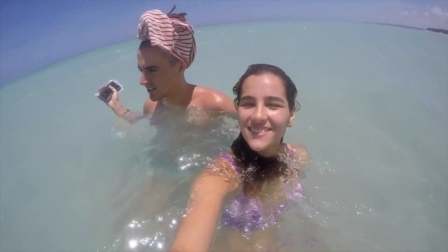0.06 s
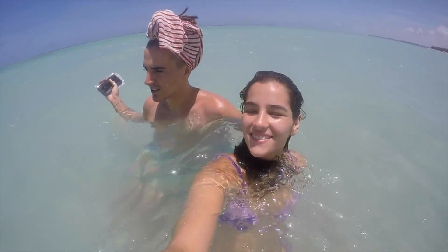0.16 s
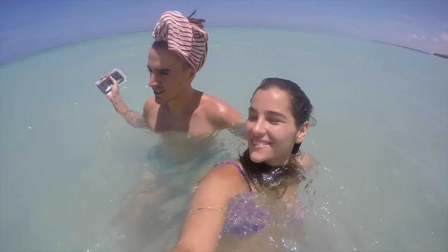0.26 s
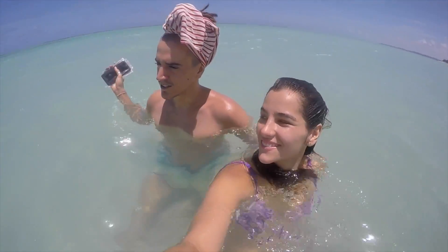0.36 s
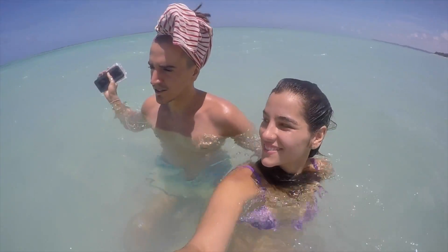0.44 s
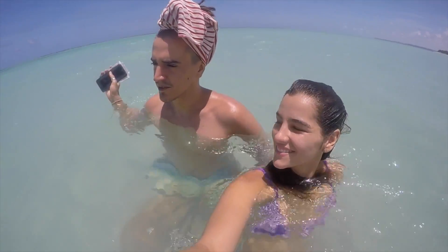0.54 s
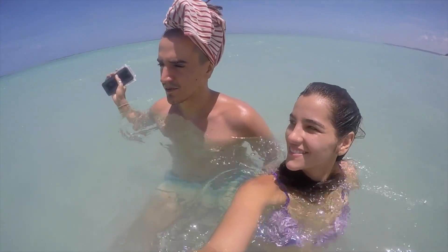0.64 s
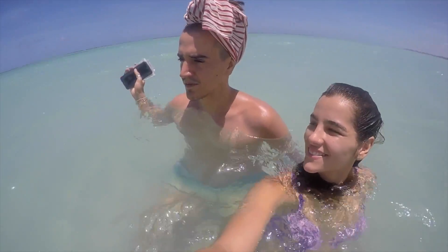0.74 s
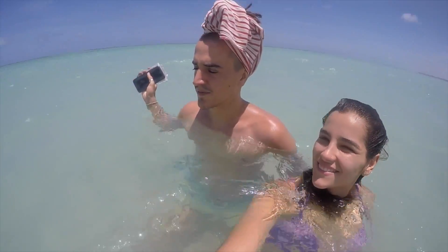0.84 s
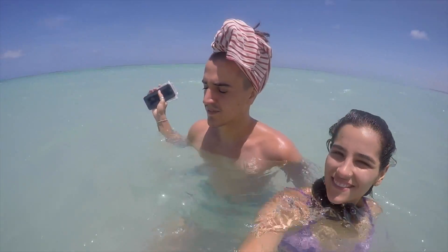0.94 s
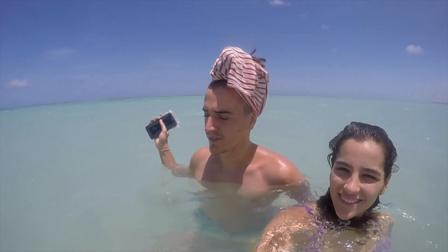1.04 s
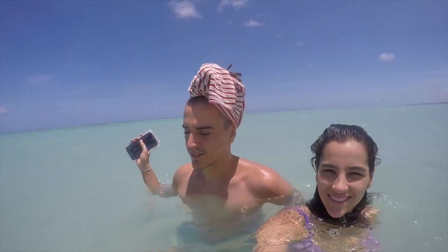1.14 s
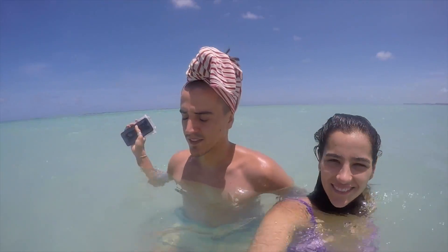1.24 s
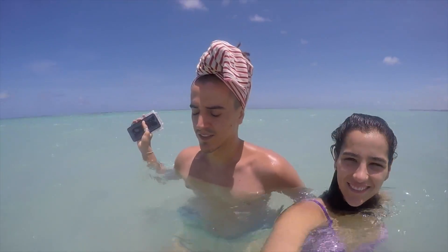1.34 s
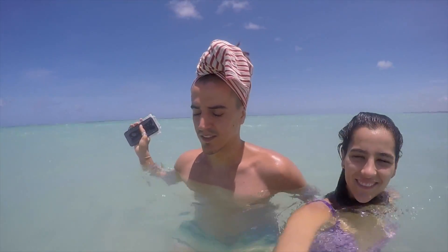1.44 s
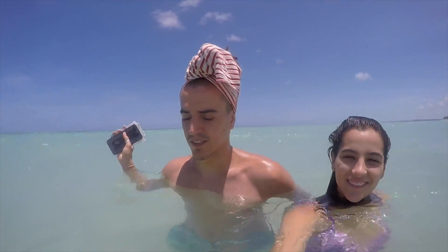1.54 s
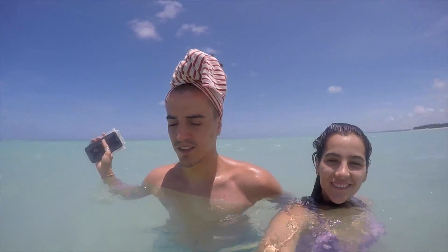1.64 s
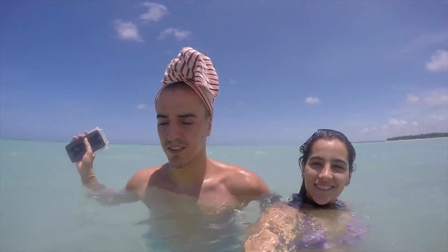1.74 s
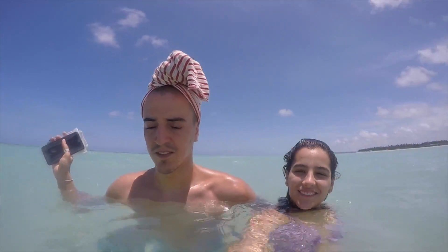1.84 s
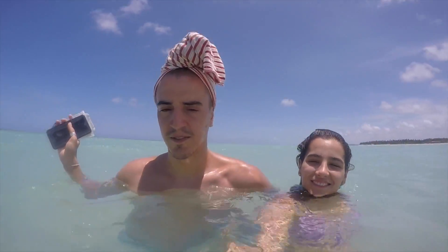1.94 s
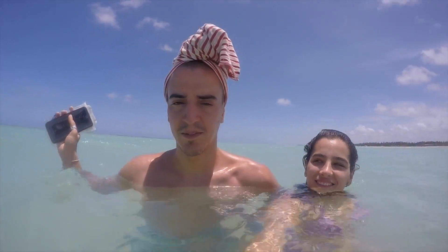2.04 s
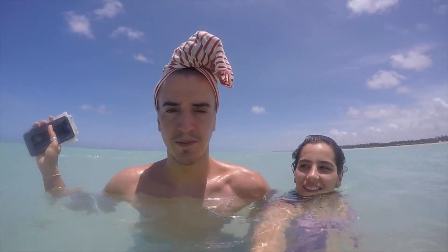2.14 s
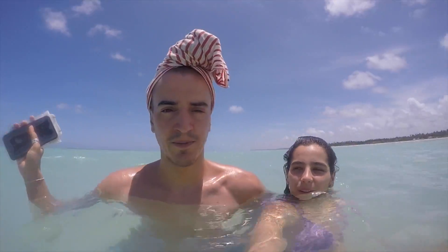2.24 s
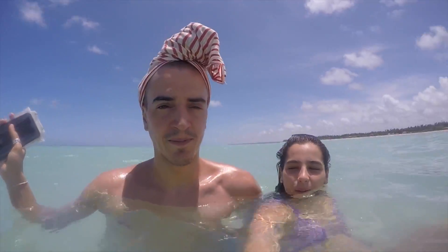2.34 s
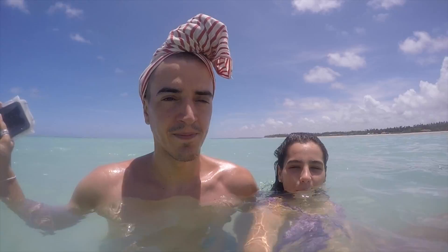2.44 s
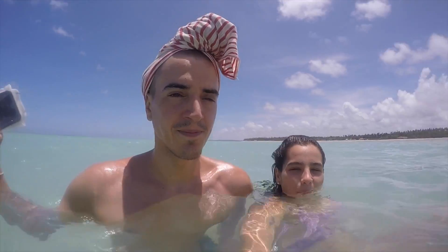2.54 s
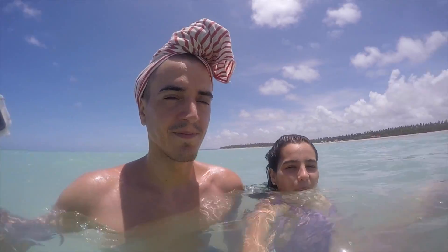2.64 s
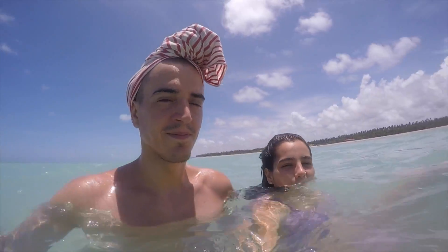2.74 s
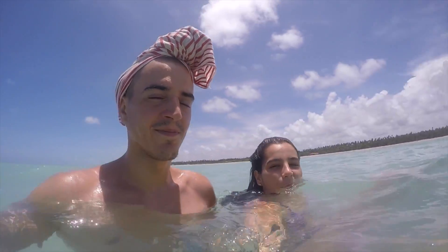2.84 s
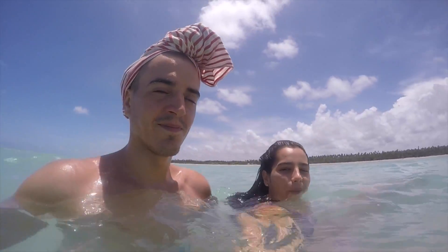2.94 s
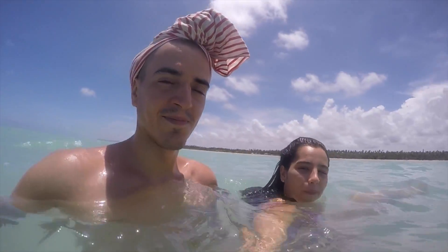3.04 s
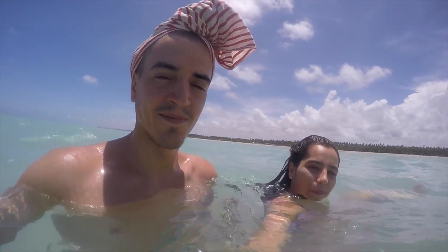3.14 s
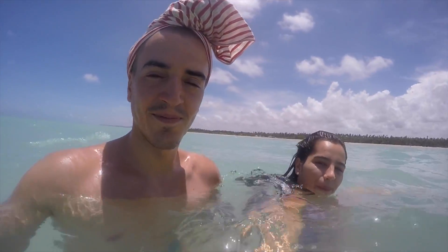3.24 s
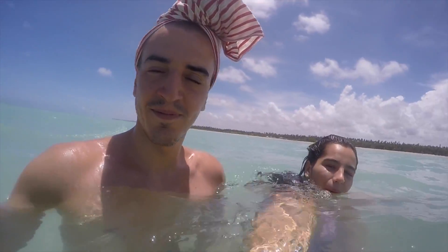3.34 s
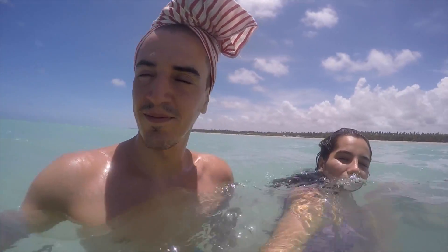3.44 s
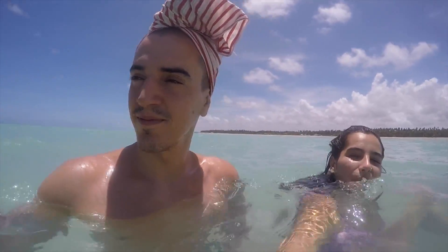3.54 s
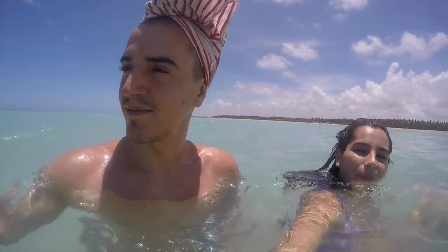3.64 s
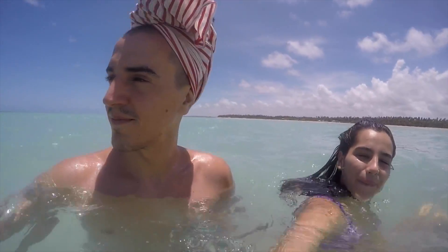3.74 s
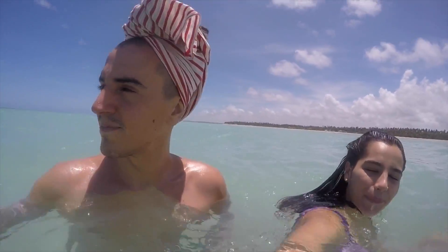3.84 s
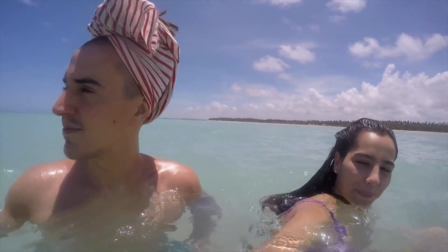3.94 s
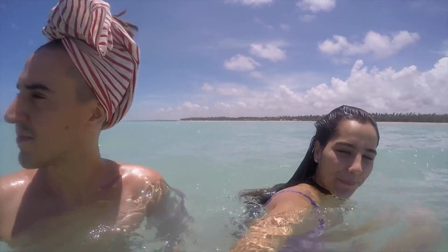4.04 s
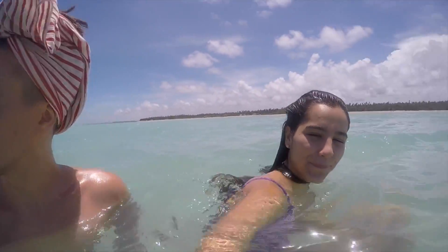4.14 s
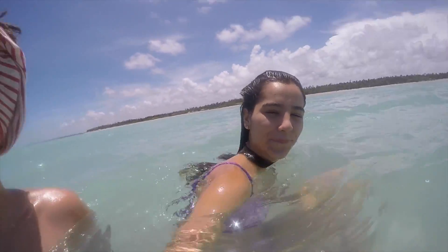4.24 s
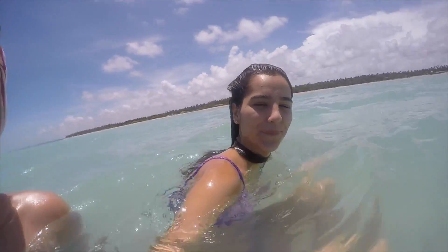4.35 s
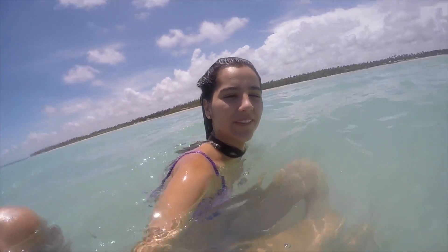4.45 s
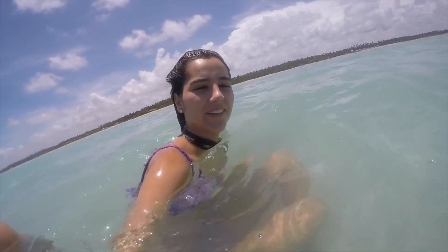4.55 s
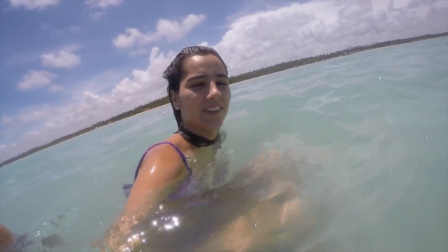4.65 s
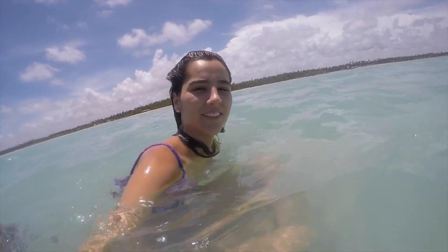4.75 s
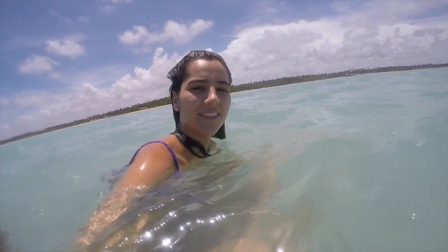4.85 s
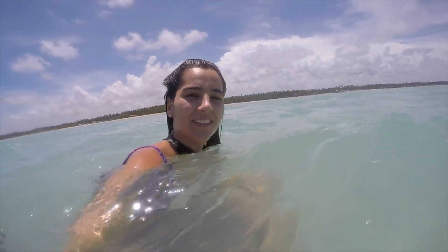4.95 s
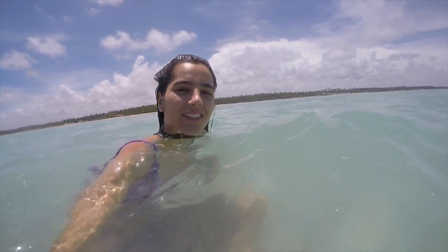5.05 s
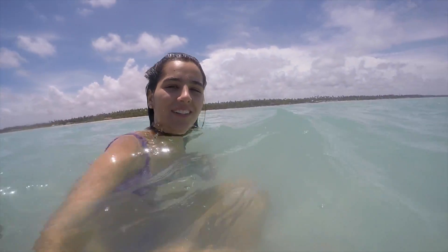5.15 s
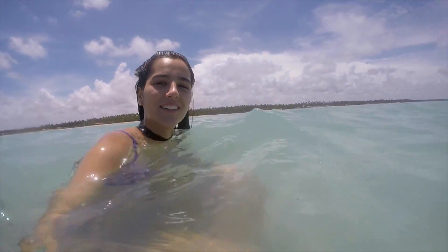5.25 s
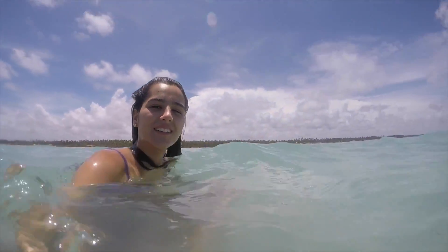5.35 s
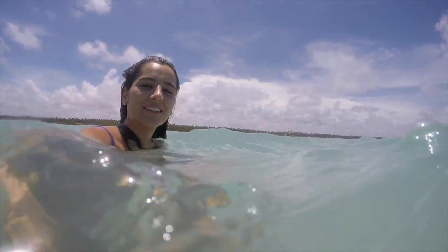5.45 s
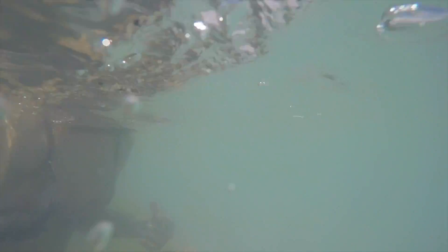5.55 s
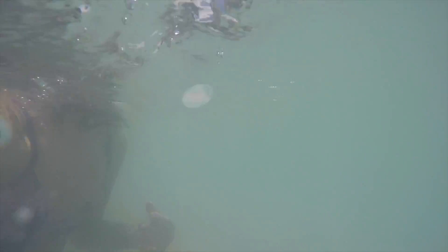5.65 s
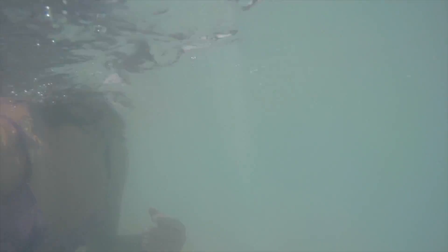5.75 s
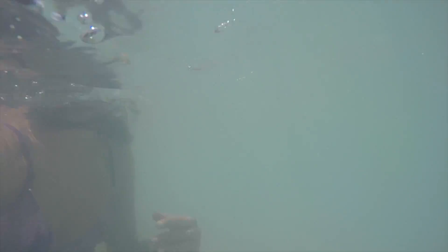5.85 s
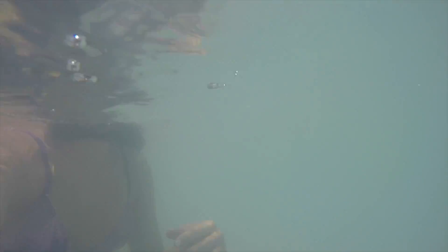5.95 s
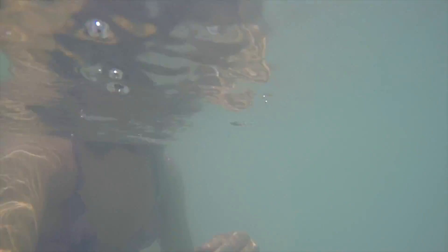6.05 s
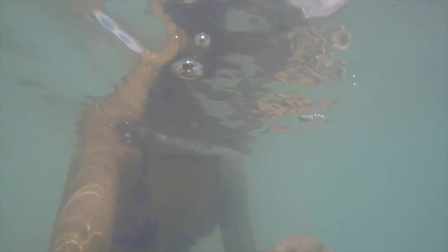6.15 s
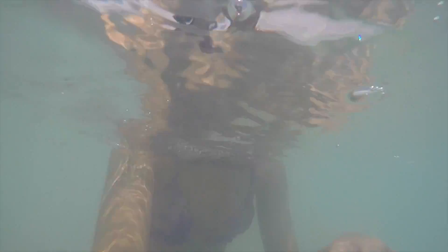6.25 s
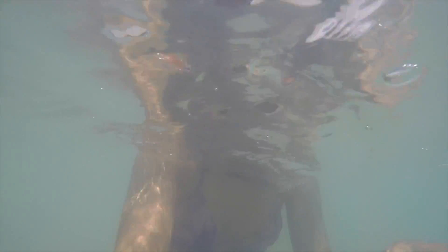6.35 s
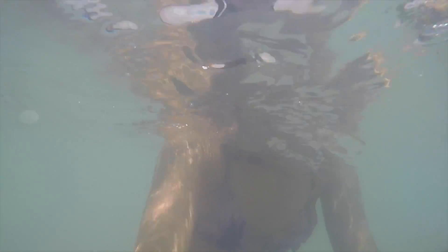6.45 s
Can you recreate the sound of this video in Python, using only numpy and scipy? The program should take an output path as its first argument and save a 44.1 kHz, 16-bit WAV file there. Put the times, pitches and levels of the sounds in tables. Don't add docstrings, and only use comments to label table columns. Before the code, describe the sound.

A small waterproof camera held just above a calm shallow sea: deep wind rumble, faint hiss, soft foam lapping and scattered watery plinks. Around three seconds a wavelet slaps the housing with a quick hollow pop. After more quiet lapping, the camera plunges at about 5.3 seconds in a very loud burst of thuds, gulping bubbles and sharp spray cracks, then everything turns muffled with a few last bubbles.

```python
import sys
import numpy as np
from scipy import signal
from scipy.io import wavfile

SR = 44100
rng = np.random.default_rng(int(sys.argv[2]) if len(sys.argv) > 2 else 0)


def invert_db(level):
    return 10 ** (np.asarray(level, dtype=float) / 20)


def output_pcm(signal):
    pcm = np.clip(np.atleast_2d(signal).T, -1, 1) * 32767
    wavfile.write(sys.argv[1], SR, np.round(pcm).astype(np.int16))


N = 286209
PLUNGE_S, FLOODED_S = 5.2, 5.57


def evened(x):
    return x / np.sqrt(np.mean(x ** 2) + 1e-20)


def curve(rows):
    s, db = np.transpose(rows)
    return invert_db(np.interp(np.arange(N) / SR, s, db, left=-120, right=-120))


def coloured(x, points):
    f, db = np.transpose(points)
    hz = abs(np.fft.fftfreq(8192, 1 / SR))
    gain_db = np.interp(np.log(hz + 1), np.log(f + 1), db, right=-80)
    log_gain = np.log(invert_db(gain_db))
    phase = -signal.hilbert(log_gain).imag
    taps = np.fft.ifft(np.exp(log_gain + 1j * phase)).real[:4096]
    return signal.oaconvolve(x, taps / np.linalg.norm(taps))[:len(x)]


def band(x, lo_hz, hi_hz):
    sos = signal.butter(2, [lo_hz, hi_hz], "band", fs=SR, output="sos")
    return signal.sosfilt(sos, x)


def lumps(hz, depth_db):
    slow = signal.sosfilt(signal.butter(2, hz, fs=SR, output="sos"), rng.standard_normal(N))
    return evened(invert_db(depth_db * evened(slow)))


def add(mix, s, sound):
    part = mix[round(s * SR):][:len(sound)]
    part += sound[:len(part)]


def shape(db, t60_ms, rise_ms):
    rise = rise_ms / 1000
    t = np.arange(0, (t60_ms + rise_ms) / 1000, 1 / SR)
    fall = invert_db(db - 60000 * np.maximum(t - rise, 0) / t60_ms)
    return t, fall * np.sin(np.pi / 2 * np.minimum(t / rise, 1)) ** 2


def bubble(t, hz, glide, t60_ms):
    pitch = hz * glide ** np.minimum(t * 5000 / t60_ms, 1.6)
    return np.sin(2 * np.pi * np.cumsum(pitch) / SR)


# time in seconds, level in dB.
WIND_LEVEL = [(0, -33.5), (.7, -42), (1.2, -36.5), (1.45, -42), (2.3, -41.5), (3.05, -38.5), (3.4, -44.5),
              (4.1, -41), (5.15, -40), (5.3, -29.5), (5.45, -28), (5.6, -63), (5.7, -32.5), (5.8, -52),
              (6.49, -48.5)]
# frequency in Hz, strength in dB per Hz.
RUMBLE_TONE = [(8.8, -24), (15, 8.5), (35, -1), (70, -13.5), (119, -21), (313, -34), (378, -35.5),
               (500, -46), (650, -76.5), (1100, -120)]


def wind_rumble():
    pressure = evened(coloured(rng.standard_normal(N) * lumps(12, 1.2), RUMBLE_TONE))
    flutter = band(pressure, 60, 900)
    level = curve(WIND_LEVEL)
    return level * (pressure - flutter) + invert_db(-16) * level ** 0.644 * flutter


# time in seconds, level in dB.
HISS_LEVEL = [
    (0, -63.5),
    (5.2, -63.5),
    (5.8, -85),
    (5.9, -74),
    (6.49, -66),
]
# frequency in Hz, strength in dB per Hz.
HISS_TONE = [(200, -13), (600, 3), (2000, -1), (5000, -4.5), (8000, -10.5), (12000, -12.5), (15200, -17.5),
             (15700, -51)]


def hiss():
    droplets = np.minimum(rng.exponential(1, N), 1.5) * (rng.random(N) < 12 / SR)
    ticks = signal.oaconvolve(droplets, shape(2, 10, 1)[1])[:N]
    noise = rng.standard_normal(N) * (lumps(30, 0.62) + ticks)
    return curve(HISS_LEVEL) * evened(coloured(noise, HISS_TONE))


def foam(count=30):
    size = invert_db(3.3 * np.minimum(rng.exponential(1, N), 5)) * (rng.random(N) < 1500 / SR)
    kind, swarm = rng.integers(0, count, N), np.zeros(N)
    for k, hz in enumerate(np.geomspace(450, 6500, count)):
        t60_ms = rng.uniform(13, 45) * (1000 / hz) ** .5
        t, envelope = shape(0, t60_ms, 0.27)
        ring = envelope * bubble(t, hz, 1.3, t60_ms) * np.sqrt(hz / t60_ms)
        swarm += signal.oaconvolve(size * (kind == k), ring)[:N]
    return invert_db(5.0) * evened(swarm) + rng.standard_normal(N)


# time in seconds, level in dB.
LAPPING_LEVEL = [(0, -64), (.7, -69), (1.3, -69), (1.85, -80), (2.1, -68.5), (2.6, -71), (3.2, -66),
                 (4.15, -68), (5.0, -74), (5.3, -59), (5.5, -46), (5.7, -60), (5.85, -82), (6.49, -73)]
# frequency in Hz, strength in dB per Hz.
LAPPING_TONE = [(180, -38), (300, -12), (466, -5), (695, 3), (790, -5), (1780, -5.5), (9000, -30.5),
                (11700, -61), (19800, -120)]
# middle in seconds, peak in dB, length in seconds, centre pitch in Hz.
SLOSHES = [(.037, -55, 0.0423, 2000), (.038, -51, .035, 3400), (3.95, -62, .1, 4000),
           (2.12, -65, .08, 4000), (3.3, -65, .06, 4500), (0.487, -62.5, 0.073, 2130),
           (0.935, -75, 0.055, 1760), (2.005, -61.5, 0.0317, 1600), (2.183, -61, 0.1255, 1360),
           (2.452, -68, 0.104, 1420), (2.745, -54, 0.0566, 1555), (2.919, -54.5, 0.0648, 1820),
           (3.072, -46, 0.025, 1765), (3.146, -52, 0.0367, 1970), (3.399, -60, 0.093, 1614),
           (3.698, -63.5, 0.073, 1600), (3.876, -60, 0.0458, 1285), (3.929, -51, 0.0393, 1570),
           (4.01, -57.5, 0.0663, 1464), (4.312, -55, 0.031, 2476), (5.002, -59.5, 0.057, 2130)]
# time in seconds, level in dB.
SPATTER_LEVEL = [
    (5.32, -50),
    (5.403, -60),
    (5.412, -82),
    (5.42, -60),
    (5.53, -53),
    (5.541, -76),
    (5.6, -66),
    (5.66, -46),
    (5.72, -75),
]


def lapping():
    water = foam()
    edges = np.geomspace(200, 12000, 7)
    patchy = sum(lumps(8, 2.2) * band(water, lo, hi) for lo, hi in zip(edges, edges[1:]))
    level = curve(LAPPING_LEVEL)
    out = level * evened(coloured(patchy, LAPPING_TONE))
    port_hz = 2280
    out += invert_db(-1.5) * level * lumps(25, 4) * evened(band(water, port_hz - 150, port_hz + 150))
    out += curve(SPATTER_LEVEL) * lumps(60, 2.5) * evened(band(water, 500, 1300))
    for s, db, length, hz in SLOSHES:
        swell = np.hanning(round(2 * length * SR))
        start = max(s - length, 0)
        part = water[round(start * SR):][:len(swell)]
        part = part + 2 * rng.standard_normal(len(swell))
        lo, hi = hz / 3.1, hz * 1.6
        add(out, start, invert_db(db + 1.0) * swell * evened(band(band(part, lo, hi), lo, hi)))
    return out


# start in seconds, peak in dB, pitch in Hz, ring time in ms.
DRIPS = [(.066, -39, 4950, 9.3), (0.234, -45.5, 3450, 14.7), (0.3025, -43, 2325, 41),
         (.375, -49, 1248, 42.5), (0.4949, -47, 1373, 54.5), (2.0474, -51.5, 1252, 63),
         (2.069, -46, 2280, 16.2), (2.135, -43.5, 1470, 56), (2.177, -40.5, 2088, 35),
         (2.404, -49.5, 2084, 32), (2.842, -45, 1490, 27), (2.925, -43.5, 1797, 39), (.575, -50, 2190, 38),
         (.152, -48, 2330, 25), (.196, -50, 2450, 25), (.228, -52, 2150, 25), (.31, -51, 1700, 30),
         (.402, -51, 2350, 25), (.506, -48, 2300, 20), (.607, -51, 2200, 20), (1.575, -50, 2420, 30),
         (1.075, -51, 2450, 30), (1.335, -55, 2350, 80), (2.012, -52, 1850, 30), (2.222, -52, 1900, 40),
         (3.1509, -49.5, 4454, 30), (3.2914, -48, 1683, 61), (3.3365, -31.5, 2550, 32.6),
         (3.3696, -47.5, 2710, 46), (3.382, -45.5, 2320, 35.5), (3.4437, -43.5, 1360, 69),
         (3.969, -43.5, 2300, 18.2), (4.3078, -42, 1822, 53), (4.3277, -47, 1362, 45.5),
         (4.376, -42.5, 2688, 30.6), (4.415, -45.5, 2315, 23), (4.856, -41.5, 1862, 24.8),
         (4.933, -50, 3616, 22.8), (4.966, -50, 1346, 68)]
# start in seconds, peak in dB, pitch in Hz, ring time in ms.
SUNKEN_DRIPS = [(5.836, -42, 2800, 12), (5.852, -53, 2750, 30), (5.854, -47, 1800, 40),
                (5.858, -50, 1400, 60), (5.875, -58, 1650, 40), (5.836, -35.5, 2367, 12),
                (5.835, -45.5, 899, 155), (5.936, -58, 1251, 62.4), (5.852, -39.5, 4763, 17.1),
                (5.904, -58, 1400, 30), (5.9065, -46.5, 1950, 35), (6.1038, -47, 1650, 38),
                (6.3601, -56, 767.4, 120)]
# start in seconds, peak in dB, pitch in Hz.
PLOPS = [(3.521, -49, 5500), (3.95, -50, 5400), (3.97, -50, 5400), (4.213, -51, 6200), (4.31, -50, 7000),
         (3.3, -47, 6700), (.8115, -48, 1500), (.8335, -52, 1400), (.8655, -47, 1400), (1.07, -50, 1100),
         (1.412, -52, 5300), (1.867, -49, 4700), (1.867, -51, 6600), (2.047, -52, 6500), (2.17, -50, 6300),
         (1.99, -50, 1500), (.39, -50, 6400), (.433, -51, 5000), (.497, -48, 2600), (.562, -50, 4600),
         (3.014, -46, 5000), (3.0265, -40, 2500), (3.043, -43, 1800), (5.777, -35, 500), (5.853, -42, 420),
         (5.704, -36, 3800), (.811, -38.5, 710), (.833, -44, 600), (.865, -40.5, 697), (1.07, -43, 2256),
         (2.0922, -42, 1858), (2.1334, -40.5, 3300), (2.1627, -47, 3520), (2.3025, -46.5, 3720),
         (3.485, -42.5, 2500), (2.763, -45, 950), (2.9003, -41.5, 1850), (2.9443, -40, 845),
         (3.719, -47, 1840), (4.23, -42, 806), (4.282, -41.5, 860), (4.406, -37, 920), (4.855, -40.5, 3050),
         (5.182, -42, 3580), (1.61, -50, 2280), (6.454, -52.5, 5337)]
# start in seconds, peak in dB, first pitch in Hz.
RISERS = [(.0668, -53, 1249), (.53, -54.5, 1420), (.93, -56.5, 1503), (1.275, -57, 1250), (1.3, -56, 1600),
          (.905, -56, 1450), (2.16, -52, 900), (2.144, -46.5, 952), (2.18, -54, 1052), (2.819, -53, 945.5),
          (3.028, -45, 1700), (.522, -56, 1900), (4.766, -53.5, 1405), (4.86, -47, 920)]
# frequency in Hz, strength in dB per Hz.
SPRAY_TONE = [(500, -15), (2000, 1.5), (4000, 0.5), (6000, -4), (9000, -10), (13000, -12), (16000, -27)]


def drips():
    tones, ticks = np.zeros((2, N))
    plop_ms, riser_ms, drip_glide = 6.67, 105, 1.02
    kinds = [(*row, drip_glide) for row in DRIPS]
    kinds += [(*row, 0.985) for row in SUNKEN_DRIPS]
    kinds += [(*row, plop_ms, drip_glide) for row in PLOPS]
    kinds += [(*row, riser_ms, 1.5) for row in RISERS]
    for s, db, hz, t60_ms, glide in kinds:
        t, envelope = shape(db, max(t60_ms, 3), 1.27)
        beat = t * rng.uniform(250, 700) + rng.uniform(0, 2 * np.pi)
        flutter = 1 + .45 * np.sin(beat)
        add(tones, s, envelope * flutter * bubble(t, hz, glide, t60_ms))
        tick_drop_db = 17 if t60_ms == plop_ms else 21
        add(ticks, s, shape(db - tick_drop_db, 12, 1.0)[1])
    for share, size, place in rng.random((80, 3)):
        t, envelope = shape(-54.5 - 9 * size, 35 - 25 * share, 2.0)
        hz = 1300 * 5 ** share ** 1.5
        add(tones, place * FLOODED_S, envelope * bubble(t, hz, 1.1, 11))
    return tones + coloured(ticks * rng.standard_normal(N), SPRAY_TONE)


# start in seconds, peak in dB, pitch in Hz, ring time in ms, rise in ms.
THUDS = [
    (5.263, -40.5, 200, 58, 7.9),
    (5.348, -15, 178.1, 50, 2.47),
    (5.447, -23, 45.4, 150, 7.97),
    (5.505, -21.5, 133.3, 100, 7.2),
    (5.52, -25.5, 52.7, 200, 14),
    (5.636, -31.5, 219, 50, 3.6),
    (5.668, -26, 202, 108, 6.47),
    (5.686, -35.5, 72, 109, 6.86),
]


def thuds():
    out = np.zeros(N)
    for s, db, hz, t60_ms, rise_ms in THUDS:
        envelope = shape(db, t60_ms, max(rise_ms, 1))[1]
        noise = band(rng.standard_normal(SR // 3), hz / 1.4, hz * 1.32)
        lump = envelope * noise[-len(envelope):]
        add(out, s, lump * np.linalg.norm(envelope) / np.linalg.norm(lump))
    return out


# start in seconds, peak in dB, ring pitch in Hz.
SLAP_CRACKS = [
    (1.0683, -42.5, 6550),
    (2.965, -33, 1404),
    (2.9658, -36.5, 3260),
    (2.9897, -28.5, 2480),
    (3.0196, -45.5, 6980),
    (3.077, -35, 7280),
    (3.0908, -27.5, 8824),
    (3.0955, -26, 6930),
    (4.3762, -30, 4792),
]
# start in seconds, peak in dB, ring pitch in Hz.
PLUNGE_CRACKS = [(5.3055, -54, 11500), (5.3405, -37, 7500), (5.3517, -38, 4500), (5.3725, -29, 7000),
                 (5.408, -36, 7000), (5.418, -38, 7000), (5.4748, -38, 6000), (5.4795, -34, 7000),
                 (5.4925, -33, 7500), (5.511, -30, 6000), (5.516, -32, 6500), (5.533, -35, 5200),
                 (5.5235, -24, 6370), (5.5965, -50, 9000), (5.4055, -40, 12500), (5.559, -42, 12000),
                 (5.6445, -35, 12000), (5.652, -36, 9000), (5.6605, -27, 12500), (5.668, -28, 12000),
                 (5.606, -30, 11000), (5.69, -36, 10000), (5.796, -32, 11000), (5.769, -40, 11000),
                 (5.3233, -17.5, 4800), (5.3345, -32.5, 10000), (5.3671, -22.5, 5800), (5.364, -30, 5500),
                 (5.3993, -20.5, 5600), (5.4378, -30, 6600), (5.4435, -8.5, 5700), (5.45, -20.5, 7200),
                 (5.4673, -33, 5700), (5.4972, -16, 5400), (5.5032, -10.5, 5700), (5.5201, -27, 6200),
                 (5.5238, -26.5, 13330), (5.5284, -25.5, 6600), (5.5474, -15.5, 6700), (5.5535, -27, 6300),
                 (5.5634, -39, 6960), (5.606, -24, 7000), (5.618, -37, 11000), (5.6434, -31, 6400),
                 (5.6605, -19.5, 8700), (5.6676, -19, 6300), (5.6799, -27, 4800), (5.696, -34, 6300),
                 (5.7026, -38.5, 5900), (5.7325, -46.5, 4800), (5.7683, -38.5, 5600),
                 (5.7741, -29.5, 10000), (5.796, -27, 4800), (6.453, -52, 13500)]


def cracks():
    tones, bursts = np.zeros((2, N))
    for s, db, hz in SLAP_CRACKS + PLUNGE_CRACKS:
        t, envelope = shape(db, 7.5, .6)
        start = s - .0004
        add(tones, start, invert_db(-3.5) * envelope * np.sin(2 * np.pi * hz * t))
        puff = evened(band(rng.standard_normal(2000), hz / 1.725, min(hz * 1.5, 16000)))
        add(tones, start, invert_db(-6) * envelope * puff[-len(t):])
        add(bursts, start, invert_db(-10.5) * envelope)
    droplets = invert_db(2.6 * rng.exponential(1, N)) * (rng.random(N) < 250 / SR)
    crackle = signal.oaconvolve(droplets, shape(0, 3.3, 1.0)[1])[:N]
    bursts += curve(SPATTER_LEVEL) * evened(crackle)
    return tones + coloured(bursts * rng.standard_normal(N), SPRAY_TONE)


# start in seconds, peak in dB, pitch in Hz, ring time in ms.
SLAP_GULPS = [(2.9596, -24, 652.4, 55), (2.9657, -15, 2344, 10.9), (2.9892, -21, 1900, 8.5),
              (3.082, -42, 800, 40), (3.0905, -27, 520, 16), (3.096, -28, 900, 16), (3.0908, -21, 1000, 11),
              (2.9685, -24, 2100, 10), (2.99, -26, 2700, 9), (3.0906, -1, 2560, 17), (3.1, -35, 2820, 70),
              (3.098, -23, 4500, 6.9)]
# start in seconds, peak in dB, pitch in Hz, ring time in ms.
PLUNGE_GULPS = [(5.262, -36, 688, 16), (5.271, -26, 1800, 6), (5.3224, 0, 1900, 10), (5.3262, -8, 2400, 16),
                (5.3845, -15, 1900, 14), (5.399, -15, 1380, 25), (5.351, -1, 600, 8),
                (5.3506, -12.5, 294, 25), (5.3601, -1, 1151, 36), (5.3713, 1, 2348, 16.55),
                (5.3805, -10, 1767, 10.1), (5.3921, -15, 2060, 13), (5.397, -9.5, 1800, 16.8),
                (5.418, -22, 2913, 11.8), (5.422, -15, 1313, 10), (5.4353, -11.5, 1278, 22.5),
                (5.4431, 3.5, 2141, 8.9), (5.458, -18, 1172, 28), (5.4665, -3.5, 1171, 25),
                (5.4785, -10, 2085, 30), (5.4784, -11.5, 2854, 20), (5.4913, -21, 2080, 27),
                (5.5055, -5, 1215, 18), (5.5111, -6, 1791, 19), (5.5108, -12.5, 667, 31),
                (5.5135, -10, 2350, 12), (5.527, -24, 2300, 20), (5.5228, -22.5, 4325, 16),
                (5.5543, -21, 3746, 9)]
# start in seconds, peak in dB, pitch in Hz, ring time in ms.
FLOODED_GULPS = [(5.5785, -20, 1740, 10.5), (5.6056, -26, 2890, 7.9), (5.637, -13, 2215, 9.9),
                 (5.6376, -6, 916, 14.6), (5.6373, -18, 3590, 7), (5.6405, -12, 750, 22),
                 (5.6673, -18.5, 2302, 12), (5.6689, -9.5, 4153, 14.5), (5.6739, -21.5, 2804, 17.4),
                 (5.673, -13, 410, 61.5), (5.6878, -10, 1464, 34), (5.692, -20.5, 2744, 16),
                 (5.6935, -11.5, 752.6, 17.5), (5.7376, -24, 1548, 25), (5.739, -14, 2741, 22.8),
                 (5.764, -28.5, 1620, 26), (5.7742, -20, 2290, 16), (5.791, -16.5, 1087, 14.2),
                 (5.7894, -3, 1959, 11.13), (5.7645, -34.5, 2270, 40), (5.6053, -32.5, 2160, 15.3),
                 (5.654, -26, 1450, 20), (5.743, -22, 1720, 20), (5.739, -26, 1250, 25)]
# start in seconds, peak in dB, first pitch in Hz,
# ring time in ms, pitch ratio per fifth of the ring time.
SHIFTING_GULPS = [(2.9892, -16, 3950, 15, .92), (3.065, -42, 2400, 60, .85), (5.3404, -15, 2400, 12, 1.15),
                  (5.4195, -17, 2500, 20, .75), (5.448, -4, 1500, 14, 1.2), (5.64, -22, 720, 70, .9),
                  (5.697, -27, 2000, 120, .92), (5.695, -23, 830, 110, 1.02), (5.7, -36, 2750, 90, .98),
                  (5.737, -27, 620, 110, 1.25), (5.797, -27, 660, 100, 1.05), (5.798, -32, 1950, 70, .88),
                  (5.806, -38, 1550, 90, .97), (5.806, -44, 2700, 60, 1.01), (5.812, -42, 1050, 90, .95)]
# frequency in Hz, strength in dB per Hz.
FROTH_TONE = [(100, -22), (400, -4), (1200, 3), (2400, 1), (3200, -11), (5000, -33), (15000, -54)]
# pitch in Hz, level in dB, ring time in seconds.
HOUSING = [
    (880, -22.5, .15),
    (1900, -25, .1),
    (2800, -29, .07),
]


def gulps():
    tones, froth, bursts = np.zeros((3, N))
    steady = [(*row, 1) for row in SLAP_GULPS + PLUNGE_GULPS + FLOODED_GULPS]
    longest_froth_ms = 45
    for s, db, hz, t60_ms, glide in steady + SHIFTING_GULPS:
        ring_ms = max(t60_ms, 2)
        rise_ms = max(min(.072 * t60_ms, 2.7), .1)
        t, envelope = shape(db, ring_ms, rise_ms)
        wobble = 1 + .035 * np.sin(t * rng.uniform(400, 900) + rng.uniform(0, 2 * np.pi))
        add(tones, s, envelope * bubble(t, hz * wobble, glide, t60_ms))
        puff = shape(db - 15, min(1.3 * ring_ms, longest_froth_ms), rise_ms)[1]
        noise = evened(band(rng.standard_normal(len(puff) + 600), hz / 1.35, hz * 1.35))
        add(froth, s, puff * noise[-len(puff):])
        add(bursts, s, shape(db - 15, min(0.97 * ring_ms, longest_froth_ms), 0.4)[1])
    froth += coloured(bursts * rng.standard_normal(N), FROTH_TONE)

    t = np.arange(SR // 4) / SR
    flooded = froth * (np.arange(N) > FLOODED_S * SR)
    housing = np.zeros(N)
    for hz, db, t60 in HOUSING:
        ring = invert_db(db - 60 * t / t60) * np.sin(2 * np.pi * hz * t)
        housing += lumps(54, 4.9) * signal.oaconvolve(flooded, ring)[:N]

    scatter = shape(0, 62, 5.4)[1]
    scatter = scatter * rng.standard_normal(len(scatter)) / np.linalg.norm(scatter)
    middle = band(band(tones + froth, 250, 2600), 250, 2600)
    tail = invert_db(-19.5) * lumps(70, 5.2) * signal.oaconvolve(middle, scatter)[:N]
    tail *= np.where(np.arange(N) < PLUNGE_S * SR, invert_db(-8), 1)
    return tones + froth + tail + invert_db(-27) * housing


def scene():
    background = wind_rumble() + hiss() + lapping() + drips()
    return (background + thuds() + cracks() + gulps())[None]


def roll_off(x):
    return signal.sosfilt(signal.butter(12, 16660, fs=SR, output="sos"), x)


def record(dry):
    edge = signal.firwin(255, 16300, window=("kaiser", 10), fs=SR)
    limited = signal.oaconvolve(np.clip(dry, -.93, .93), edge[None], "same")
    return roll_off(limited)


dry = scene()
out = record(dry)
output_pcm(out)
```